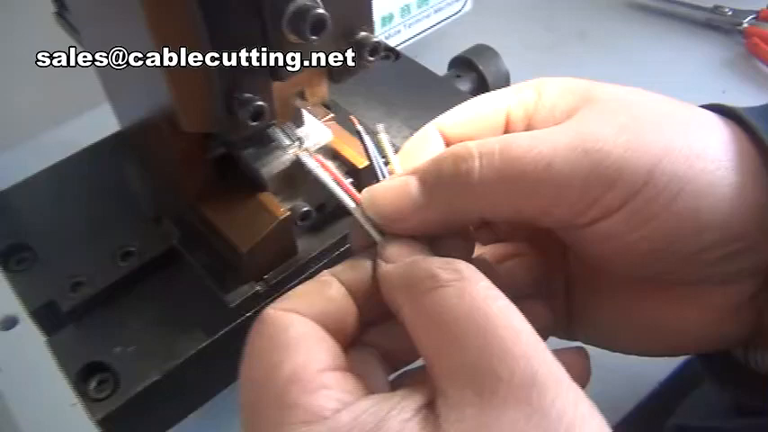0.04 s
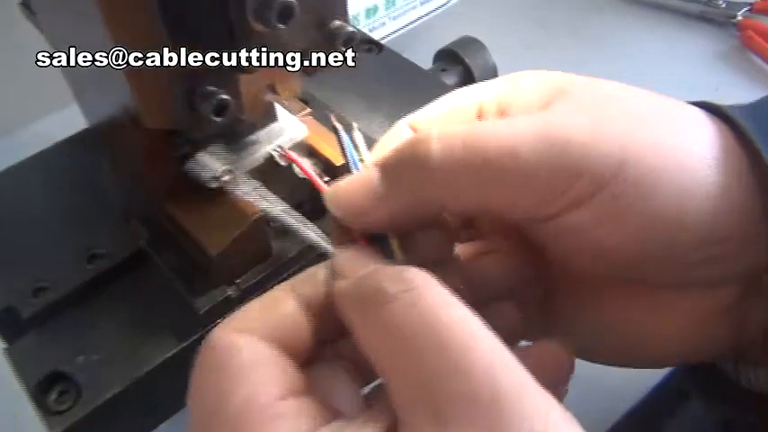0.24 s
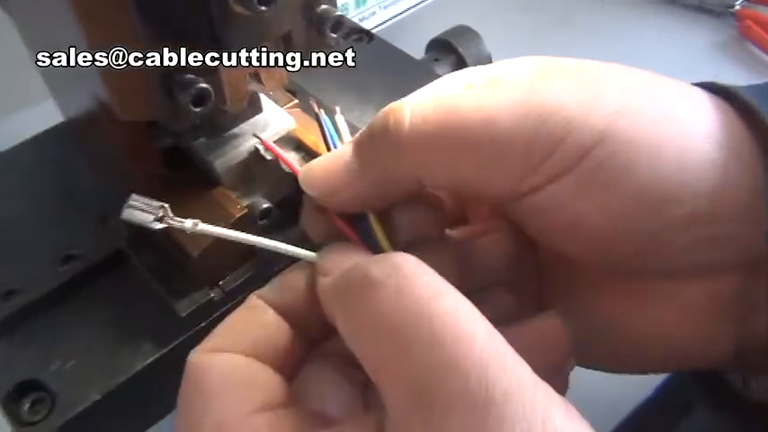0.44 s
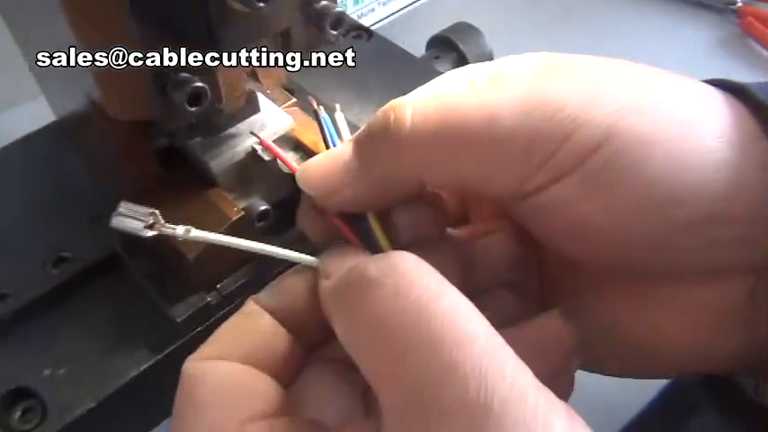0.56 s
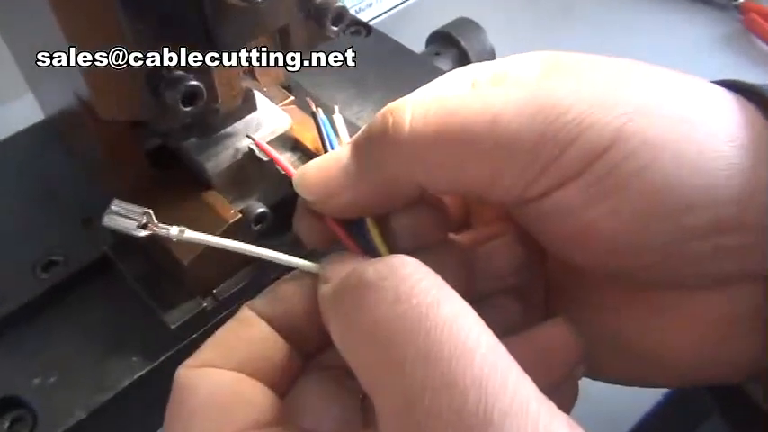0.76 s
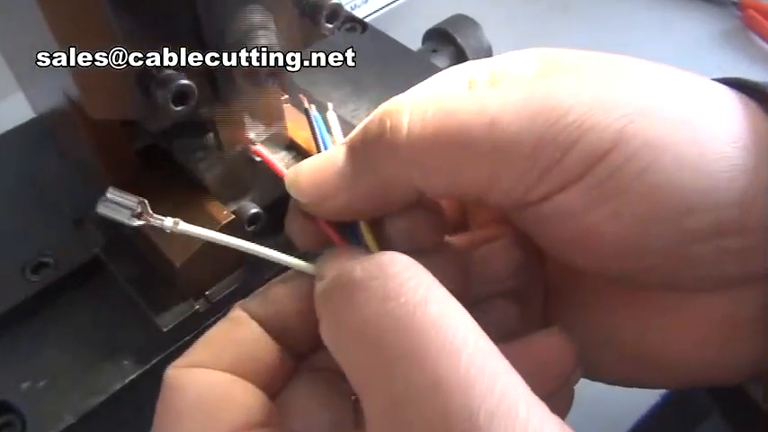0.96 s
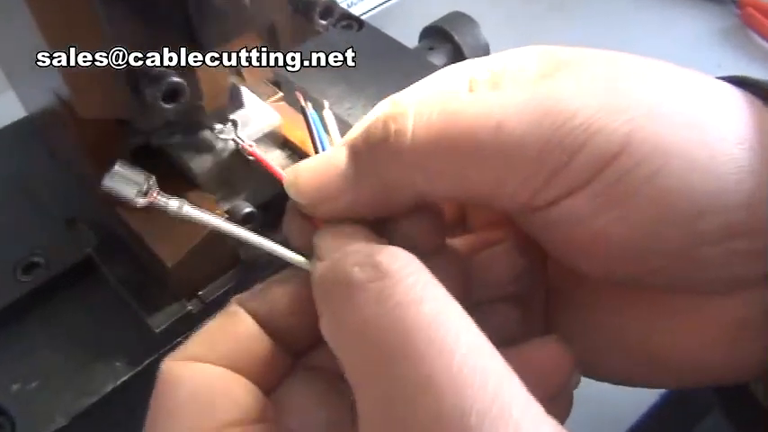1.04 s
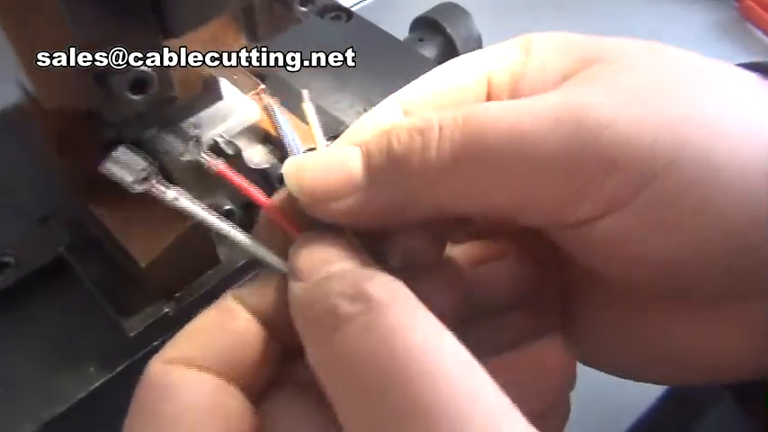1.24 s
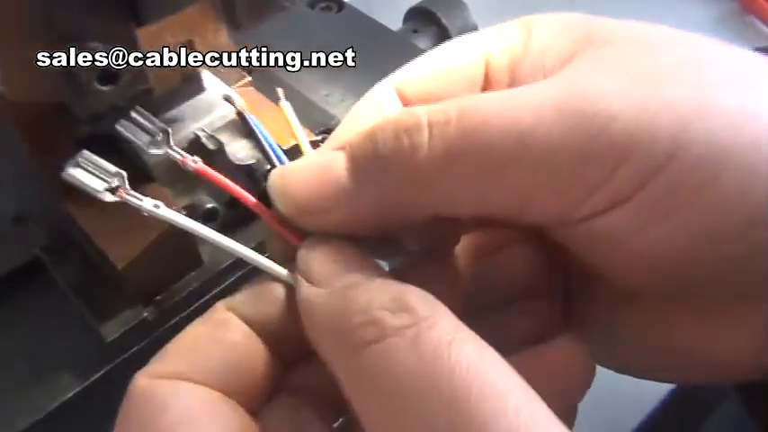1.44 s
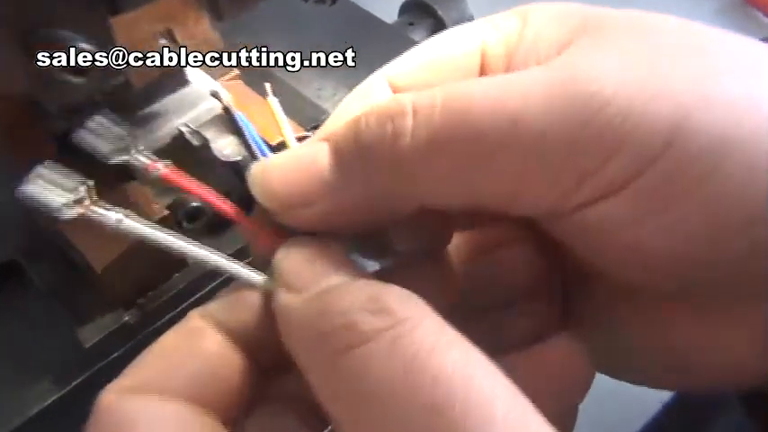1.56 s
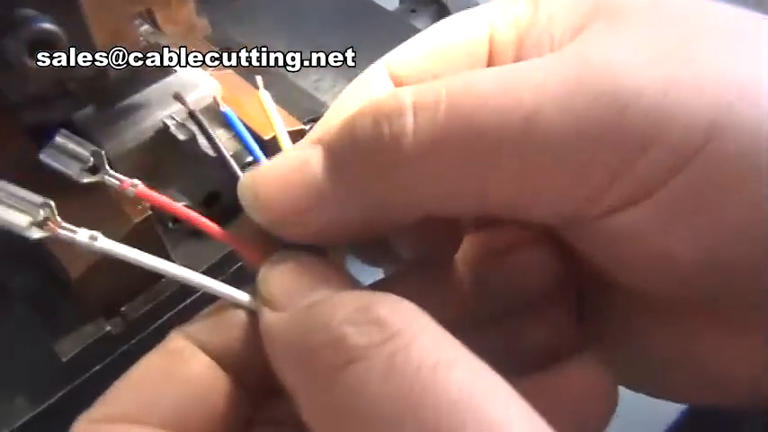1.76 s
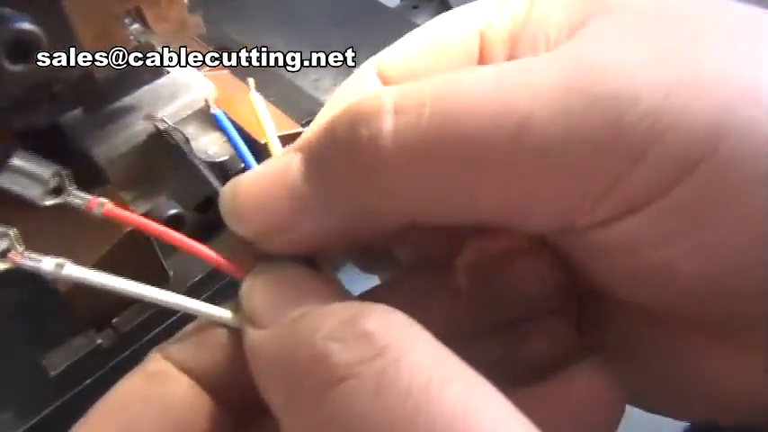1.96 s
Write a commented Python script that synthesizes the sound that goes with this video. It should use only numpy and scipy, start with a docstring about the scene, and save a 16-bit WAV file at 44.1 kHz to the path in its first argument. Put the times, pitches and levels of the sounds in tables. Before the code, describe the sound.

A crimping press makes one loud stroke over a steady low workshop hum. Metal rings faintly far off at about 0.2 seconds. At 0.8 seconds the nearby press clicks in and knocks, then rattles, clanks and judders until about 1.1 seconds, with a thin, faint whistle before and after. A low rumble and room echo fade by 1.5 seconds, with a light wire tick near 1.4. The hum continues.

```python
"""A workshop hums and metal rings faintly far off; then a bench crimping press makes one stroke.
The clutch clicks in and knocks, the ram and terminal feed rattle, parts clank and the pawls click home:
impacts that excite the modes of the steel. The cast frame judders and groans under load.
A thin whistle comes before and after. The drive rumbles on, the wires tick as they are drawn out,
and the room reverberates."""
import sys
import numpy as np
from scipy import signal
from scipy.fft import rfft, irfft
from scipy.io import wavfile

SR = 44100
rng = np.random.default_rng(int(sys.argv[2]) if len(sys.argv) > 2 else 0)


def bounce(signal):
    """Save signal as a 16-bit WAV file at the path given by the first command-line argument."""
    frames = np.transpose(np.atleast_2d(signal))
    limited = np.clip(frames, -1, 1)
    pcm = np.round(limited * 32767).astype(np.int16)
    wavfile.write(sys.argv[1], SR, pcm)


N = 88200
T = np.arange(N) / SR

# modes of the steel parts: f/Hz, relative level/dB, t60/s
STEEL_MODES = [(865, -8, .1), (1090, -10, .15), (1185, -12, .3), (1430, -6, .035), (1700, -4, .03),
               (1927, 1, .04), (2190, -5, .11), (2550, -8, .08), (2778, -8, .045), (3521, -6, .035),
               (3960, -9, .05), (4850, -6, .03), (5650, -5, .03), (6390, -5, .04), (7450, -4, .03),
               (8350, -2, .03)]
# modes of the cast frame: f/Hz, relative level/dB, t60/s
FRAME_MODES = [(124, 1, .08), (260, -8, .15), (288, -14, .2), (370, -9, .15), (441, -8, .15),
               (479, -5, .16), (540, -9, .15), (609, -12, .2), (738, -11, .2)]
# stereo image of the press, wider in the treble: f/Hz, left-right correlation
PRESS_CORRELATION = [(350, .98), (1400, .94), (3000, .9), (6500, .78), (8500, .52), (10500, .55),
                     (12000, .85)]
# white spectrum: f/Hz, level/dB
FLAT = [(1, 0), (SR, 0)]


def knocks():
    """Impact excitation: each sharp blow rings the steel's modes and leaves a decaying chatter."""
    # steel contacts: t/s, level/dB, lower f/Hz, upper f/Hz, chatter t60/s, relative chatter level/dB
    impacts = [(0.7859, -33.5, 2200, 6900, 0.046, 13), (0.7984, -33, 2410, 5960, 0.089, 18.5),
               (0.8036, -11.5, 813, 1113, 0.067, -9), (0.8548, -8.5, 1160, 2050, 0.018, -14),
               (0.855, -6.5, 2700, 3800, .01, -22), (0.857, -12.5, 594, 1100, 0.14, 0.5),
               (0.8905, -24, 1296, 7160, 0.12, -4), (0.899, -12.5, 3560, 8300, 0.17, 0.5),
               (0.9040, -8.5, 1190, 4930, 0.06, -8), (0.9236, -12, 905, 2210, 0.06, -6),
               (0.9373, -18.5, 7950, 13200, 0.17, -0.5), (0.9742, -7.5, 2580, 7700, 0.026, -11),
               (1.0140, -12, 1850, 2920, 0.03, -3), (1.03, -20, 4000, 9000, 0.043, 0),
               (1.0754, -10, 3500, 8400, 0.021, -7), (1.0935, -10.5, 3250, 7760, 0.037, -4),
               (1.1032, -9, 2160, 5660, 0.018, -19), (1.102, -12, 9700, 12200, 0.036, -2)]
    blows, chatters, grains = 0, 0, chatter()
    for start, db, low_hz, high_hz, t60, chatter_db in impacts:
        click = np.zeros(N)
        click[int(start * SR)] = 3
        gain = from_db(db) * np.sqrt(4000 / max(high_hz - low_hz, 300))  # offsets the bandwidth
        blows += gain * band(band(click, low_hz, high_hz), low_hz, high_hz)
        chatters += gain * from_db(chatter_db) * .5 * band(grains * decay(start, t60), low_hz, high_hz)
    return blows + chatters + from_db(-31) * resonate(blows, STEEL_MODES)


def clanks(attack_s=.00095):
    """Free vibration: a struck part rings briefly as a damped sinusoid at its natural frequency."""
    # struck parts: t/s, f/Hz, level/dB, t60/s
    strikes = [(0.8555, 1930, -15, 0.026), (0.890, 806, -16.5, 0.032), (0.902, 2800, -23.5, 0.099),
               (0.973, 2236, -18, 0.047), (0.982, 1737, -18, 0.03), (1.0133, 2558, -17, 0.045),
               (1.0155, 1936, -20, 0.067)]
    return sum(from_db(db) * decay(start, t60) * ramp(start, attack_s)
               * np.sin(2 * np.pi * hz * (T - start)) for start, hz, db, t60 in strikes)


def rattle():
    """Random excitation: small impacts of the moving ram and feed drive the frame and steel modes."""
    # course of the stroke: t/s, bass level/dB, middle level/dB, treble level/dB
    travel = [(0.784, -45, -39, -44), (0.808, -58, -34, -38.5), (0.85, -28, -41, -41.5),
              (0.86, -36, -31, -35.5), (0.884, -40.5, -33, -33), (0.909, -31, -25.5, -27),
              (0.945, -36, -27.5, -29), (0.985, -27, -27.5, -33.5), (1.035, -23.5, -28, -36),
              (1.065, -28.5, -32, -33), (1.077, -40, -41.5, -30), (1.107, -36, -32.5, -29.5),
              (1.125, -50, -62, -86)]
    # spectra of the three registers: f/Hz, relative spectral level/dB
    bass_spectrum = [(60, -51), (170, -4), (250, -0.5), (380, 3.5), (480, 5.5), (700, -4.5), (1100, -48),
                     (3000, -60)]
    middle_spectrum = [(300, -42), (700, 3.5), (1200, 7), (1600, 4.5), (2300, 1.5), (3100, -4), (5000, -17),
                       (13000, -64)]
    treble_spectrum = [(1500, -13), (3000, 5), (4200, 9), (6000, 1), (8200, 1.5), (10200, -5.5), (12000, 2),
                       (14000, -15)]
    times, bass_db, middle_db, treble_db = np.transpose(travel)
    bass, middle, treble = contacts(), clatter(700, 3200, count=14), clatter(3000, 13000, count=30)
    bass = contour(times, bass_db) * coloured(bass, bass_spectrum, PRESS_CORRELATION)
    middle = contour(times, middle_db) * coloured(middle, middle_spectrum, PRESS_CORRELATION)
    treble = contour(times, treble_db) * coloured(treble, treble_spectrum, PRESS_CORRELATION)
    frame = from_db(-54.5) * resonate(bass, FRAME_MODES)
    steel = from_db(-49) * resonate(middle + treble, STEEL_MODES)
    return bass + middle + treble + frame + steel


def clatter(low_hz, high_hz, count, clinks_per_s=70, t60=.03, clink_weight=.55):
    """Superposition: loose parts, each a resonator struck at random, clink among dry contacts."""
    span_hz = high_hz - low_hz
    pitches = np.linspace(low_hz, high_hz, count) + rng.uniform(-.53, .47, count) * span_hz / count
    clinks = 0
    for hz in pitches:
        hits = (rng.random((2, N)) < clinks_per_s / SR) * rng.standard_normal((2, N))
        clinks += resonate(hits, [(hz, 0, t60)])
    clink_power = clink_weight * span_hz / (SR / 2)
    return np.sqrt(clink_power) * unit_rms(clinks) + np.sqrt(1 - clink_weight) * unit_rms(contacts())


def contacts(per_s=2600, spread_db=3.2):
    """Poisson process: two independent streams of clicks of uneven size."""
    hits = (rng.random((2, N)) < per_s / SR) * rng.choice([-1, 1], (2, N))
    return hits * from_db(spread_db * np.minimum(rng.exponential(1, (2, N)), 4))


def chatter():
    """Shot noise: dense contacts merge into a flat spectrum, in stereo."""
    return coloured(contacts(), FLAT, PRESS_CORRELATION)


def judder(jolts_per_s=123, jitter=.03, low_hz=64.6):
    """Forced vibration: short trains of nearly periodic jolts shake the loaded frame."""
    # jolt trains: start t/s, duration/s, drive level/dB, upper f/Hz
    trains = [(0.855, .03, -30.5, 210), (0.941, .025, -37.5, 300), (1.021, .043, -30, 493),
              (1.215, .025, -40.5, 220), (1.315, .025, -41.5, 220), (1.505, .025, -42, 220)]
    force = 0
    for start, length, db, high_hz in trains:
        beats = np.arange(int(length * jolts_per_s) + 1)
        times = start + (beats + jitter * rng.standard_normal(len(beats))) / jolts_per_s
        jolts = np.zeros(N)
        jolts[(times * SR).astype(int)] = from_db(db)
        force += band(jolts, low_hz, high_hz)
    return resonate(force, FRAME_MODES)


def groans(edge_s=.008):
    """Resonance: the loaded frame sings on one mode after another and stops as the load lets go."""
    # sounding modes: start t/s, end t/s, f/Hz, level/dB
    notes = [(0.856, 0.933, 254.8, -33), (0.917, 1.01, 475.7, -30.5), (0.935, 1.027, 740.4, -35.5),
             (0.977, 1.016, 377, -25.5), (1.012, 1.047, 613, -30.5), (1.026, 1.076, 476, -23.5)]
    return sum(from_db(db) * held(start, end - edge_s / 2, edge_s, edge_s)
               * wavering(hz, depth=.33, half_width_hz=45) for start, end, hz, db in notes)


def drive_rumble():
    """Filtered shot noise: the drive runs on with a low rumble after the stroke."""
    # envelope of the rumble: t/s, level/dB
    levels = [(1.08, -52), (1.16, -33.5), (1.3, -38), (1.419, -36), (1.48, -54), (1.7, -58), (2.0, -45.5)]
    # its colour: f/Hz, relative spectral level/dB
    spectrum = [(150, -15), (250, 3), (450, -14), (570, 4), (750, -6.5), (950, -12.5), (1700, -10),
                (4000, -43)]
    return contour(*np.transpose(levels)) * coloured(contacts(), spectrum)


def whistle(hz=11941):
    """Beating: a thin, high tone of the mechanism is roughened by noise close to its frequency."""
    # whistles: start t/s, end t/s, level/dB
    spells = [(0.803, 0.842, -35.5), (1.197, 1.276, -39.5), (1.265, 1.38, -67)]
    envelope = sum(from_db(db) * held(start, end, attack_s=.026, release_s=.016)
                   for start, end, db in spells)
    return envelope * wavering(hz, depth=.38, half_width_hz=180)


def wire_ticks(low_hz=5440):
    """High-passed shot noise: the terminals tick and rustle as the wires are drawn out."""
    # light touches: t/s, level before the filter/dB, t60/s
    touches = [(1.4122, -33.5, 0.019), (1.4215, -45, .025), (1.4884, -59, 0.14), (1.928, -60, .14)]
    grains = chatter() * sum(from_db(db) * decay(start, t60) for start, db, t60 in touches)
    return signal.sosfilt(signal.butter(2, low_hz, "high", fs=SR, output="sos"), grains + 1e-18)


def reverberation(x, onset_s=.027):
    """Diffuse field: convolution with noise that decays band by band, fastest in the high treble."""
    # room response: f/Hz, level/dB, t60/s
    response = [(60, -26, 0.94), (128, -10, 1.1), (300, -8, 0.66), (620, -7.5, 3.6), (1460, -12.5, 1.1),
                (2960, -6, 1.4), (5860, -12, 0.8), (12000, -10, 0.47)]
    edges_hz, tail = np.geomspace(50, 15000, 13), 0
    noises = [stereo_noise(FLAT) for _ in range(2)]
    for k, (low, high) in enumerate(zip(edges_hz, edges_hz[1:])):
        centre_hz = np.sqrt(low * high)
        envelope = decay(0, at_hz(response, centre_hz, column=2)) * ramp(0, onset_s)
        envelope /= np.sqrt(np.sum(envelope ** 2))  # unit energy
        tail += from_db(at_hz(response, centre_hz)) * band(noises[k % 2], low, high) * envelope
    return signal.fftconvolve(x, tail, axes=1)[:, :N]


def far_ring(start=.164, attack_s=.014):
    """Modal decay: distant metal rings, blurred by the room into bands of noise."""
    # ringing bands: centre f/Hz, bandwidth/Hz, level/dB, t60/s
    bands = [(2050, 1460, -43, 1.1), (6590, 120, -49.5, 0.98), (6360, 450, -53, 0.82),
             (11380, 170, -62, 0.54)]
    noise = stereo_noise(FLAT)
    rings = sum(from_db(db) * decay(start, t60) * narrowband(noise, hz, width / 2)
                for hz, width, db, t60 in bands)
    return rings * ramp(start, attack_s)


def shop_hum():
    """Machinery noise: a broadband drone, one throbbing resonance and two wavering motor tones."""
    # colour of the drone: f/Hz, relative spectral level/dB
    spectrum = [(20, -14), (96, -20.5), (130, -12.5), (180, -11.5), (270, -5.5), (380, -5), (696, -14.5),
                (1020, -17.5), (1450, -17.5), (3260, -30), (4900, -38.5), (7160, -47), (13000, -60)]
    # its envelope: t/s, level/dB
    levels = [(0.1, -34.5), (0.7, -38), (1.4, -35), (2.0, -39)]
    # motor tones: f/Hz, level/dB
    motors = [(996, -50), (1246, -49.5)]
    drone = from_db(np.interp(T, *np.transpose(levels))) * stereo_noise(spectrum)
    throb = from_db(-40) * narrowband(rng.standard_normal(N), hz=338.3, half_width_hz=38.8)
    tones = sum(from_db(db) * wavering(hz, depth=.28, half_width_hz=9.5) for hz, db in motors)
    return drone + throb + tones


def placed(x):
    """Interaural level difference: the press sits slightly to the left."""
    # balance: f/Hz, left minus right level/dB
    balance = [(120, 0), (800, .6), (1100, 1.5), (1700, .8), (2400, 2.4), (3900, 2.8), (5000, 1), (9000, 0)]
    tilt_db = at_hz(balance, np.arange(N + 1) * SR / (2 * N))
    return irfft(rfft(x, 2 * N) * from_db(tilt_db * [[.5], [-.5]]))[:, :N]


def coloured(x, spectrum, correlation=None, mono_below_hz=230):
    """Mid-side mixing: two independent signals take on a spectrum and a correlation, at rms 1."""
    # default stereo image, nearly mono in the bass and top treble: f/Hz, left-right correlation
    background_correlation = [(350, 1), (700, 0.94), (1400, 0.9), (3000, 0.88), (6500, 0.69), (8300, 0.98),
                              (10000, 1), (12000, 1)]
    hz = np.arange(N // 2 + 1) * SR / N
    mid, side = rfft(x) * from_db(at_hz(spectrum, hz))
    alike = np.where(hz < mono_below_hz, 1, at_hz(correlation or background_correlation, hz))
    return unit_rms(irfft(np.sqrt(1 + alike) * mid + np.sqrt(1 - alike) * side * [[1], [-1]], N))


def stereo_noise(spectrum):
    """Gaussian noise with a given spectrum and the background's left-right correlation."""
    return coloured(rng.standard_normal((2, N)), spectrum)


def resonate(x, modes):
    """Modal superposition: each mode is a damped two-pole resonator driven by x."""
    out = 0
    for hz, db, t60 in modes:
        radius, angle = from_db(-60 / (t60 * SR)), 2 * np.pi * hz / SR
        feedback = [1, -2 * radius * np.cos(angle), radius ** 2]
        out += from_db(db) * signal.lfilter([np.sin(angle)], feedback, x + 1e-18)
    return out


def wavering(hz, depth, half_width_hz):
    """Interference with narrowband noise makes a tone waver in level and phase; rms about 1."""
    blur = narrowband(rng.standard_normal(N), hz, half_width_hz)
    return np.sqrt(2) * np.sin(2 * np.pi * (hz * T + rng.random())) + depth * blur


def narrowband(x, hz, half_width_hz):
    """The band of x around a centre frequency, at rms 1."""
    return unit_rms(band(x, hz - half_width_hz, hz + half_width_hz))


def band(x, low_hz, high_hz):
    """Band-pass filter."""
    return signal.sosfilt(signal.butter(2, [low_hz, high_hz], "band", fs=SR, output="sos"), x + 1e-18)


def decay(start, t60):
    """Exponential damping: a jump to 1, then a fall of 60 dB every t60 seconds."""
    return (T >= start) * np.exp(-np.log(1000) * np.maximum(T - start, 0) / t60)


def ramp(start, rise_s):
    """Linear rise from 0 to 1."""
    return np.clip((T - start) / rise_s, 0, 1)


def held(start, end, attack_s, release_s):
    """Trapezoidal envelope: rises from the start, holds, and falls after the end."""
    return np.minimum(ramp(start, attack_s), 1 - ramp(end, release_s))


def contour(times, db):
    """Envelope interpolated in decibels, silent before its first point."""
    return from_db(np.interp(T, times, db)) * (T > times[0])


def at_hz(rows, hz, column=1):
    """Interpolate a table column on a log-frequency axis."""
    rows = np.array(rows)
    return np.interp(np.log(np.maximum(hz, 1)), np.log(rows[:, 0]), rows[:, column])


def from_db(db):
    """Decibels to amplitude ratio."""
    return 10 ** (np.asarray(db) / 20)


def unit_rms(x):
    """Scale to rms 1."""
    return x / np.sqrt(np.mean(x ** 2) + 1e-20)


def scene():
    """Superposition: the nearby press and its reverberation over the hum of the shop."""
    press = knocks() + clanks() + rattle() + judder() + groans()
    press_in_room = placed(press + reverberation(press) + drive_rumble())
    return press_in_room + whistle() + wire_ticks() + far_ring() + shop_hum()


def record(dry, cutoff_hz=13000):
    """Band limiting: the sound fades in quickly and a steep low-pass cuts the top."""
    low_pass = signal.ellip(12, .1, 80, cutoff_hz, fs=SR, output="sos")
    return signal.sosfilt(low_pass, dry * ramp(start=.073, rise_s=.018))


dry = scene()
out = record(dry)
bounce(out)
```